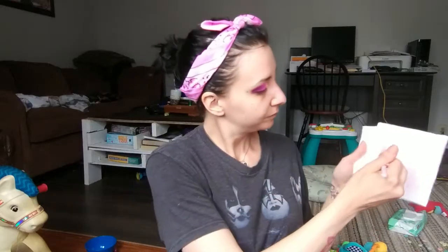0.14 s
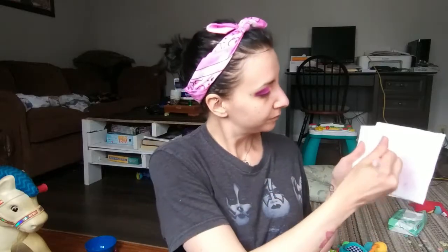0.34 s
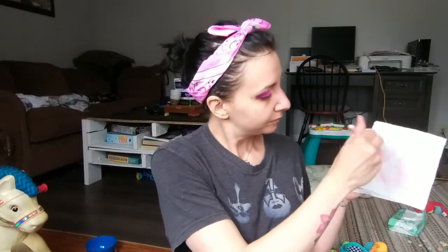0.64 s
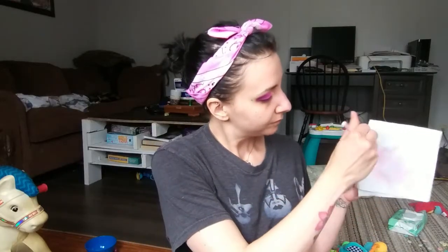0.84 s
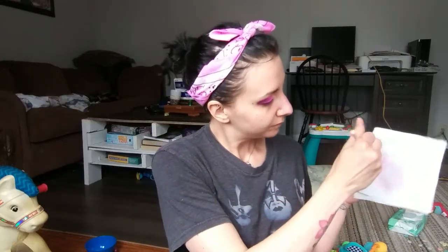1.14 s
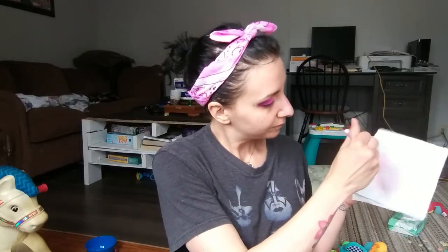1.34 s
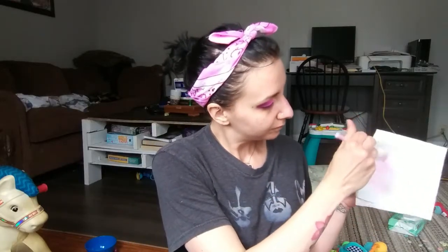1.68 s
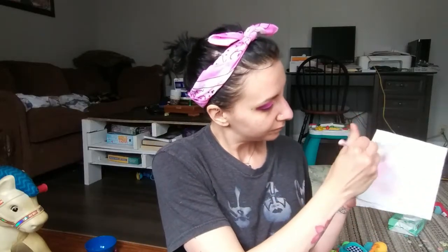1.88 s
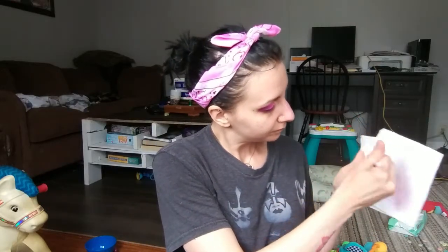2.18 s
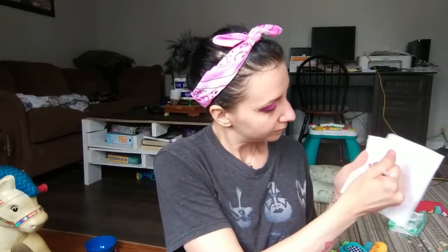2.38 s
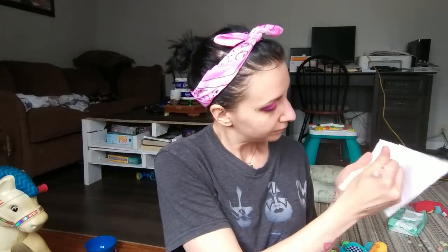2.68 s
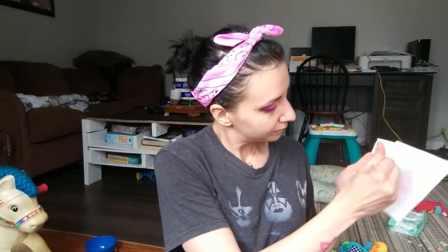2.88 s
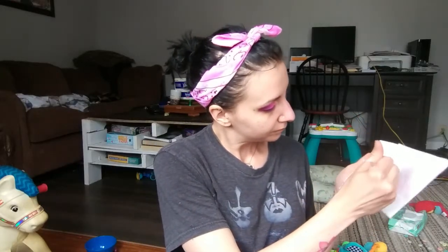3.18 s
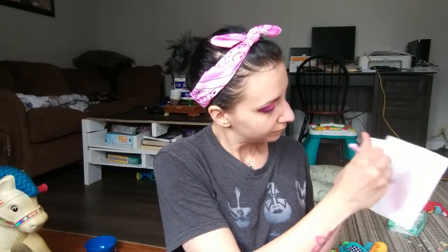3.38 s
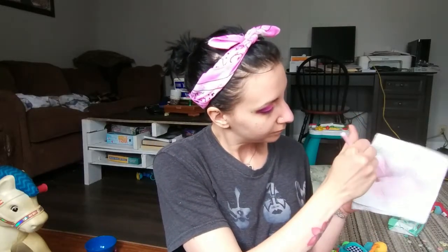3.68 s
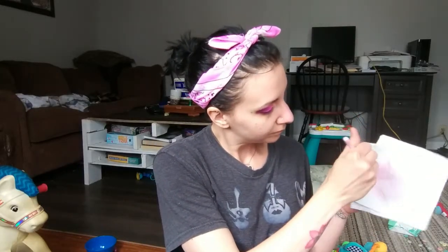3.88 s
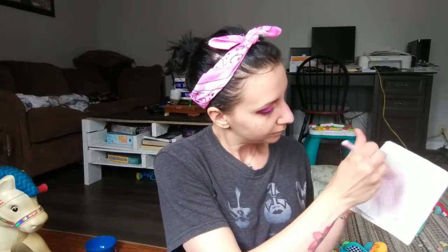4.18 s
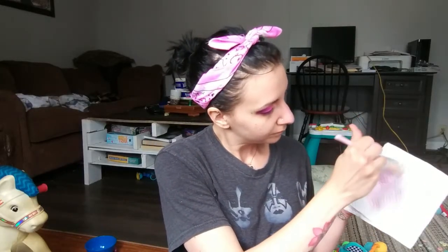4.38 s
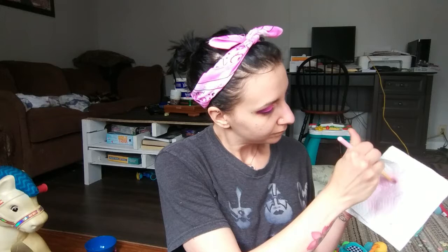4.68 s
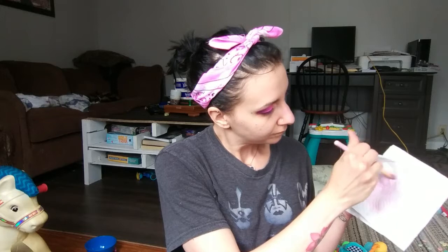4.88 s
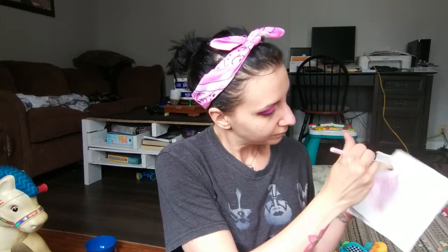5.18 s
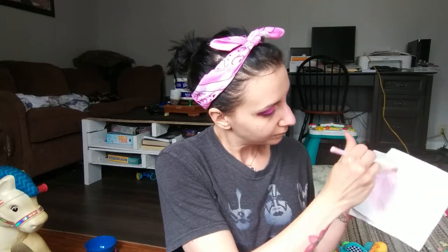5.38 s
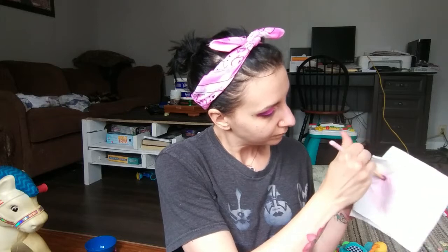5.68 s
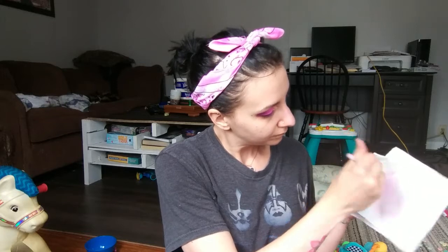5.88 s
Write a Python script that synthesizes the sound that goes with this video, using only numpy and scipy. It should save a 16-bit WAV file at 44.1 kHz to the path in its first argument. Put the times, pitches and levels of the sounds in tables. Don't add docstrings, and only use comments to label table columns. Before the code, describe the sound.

A soft makeup brush scrubs quickly back and forth on a paper towel, dry and hissy, with tiny clicks over a low room hum.

```python
import sys
import numpy as np
from scipy import signal
from scipy.fft import rfft, irfft
from scipy.io import wavfile

SR = 44100
rng = np.random.default_rng(int(sys.argv[2]) if len(sys.argv) > 2 else 0)


def pcm_store(signal):
    levels = np.round(np.clip(np.atleast_2d(signal), -1, 1) * 32767)
    wavfile.write(sys.argv[1], SR, levels.astype(np.int16).T)


def gain_from_db(level_db):
    decades = np.asarray(level_db, float) / 20
    return 10 ** decades


N = 266805


def rms_one(x):
    return x / np.sqrt(np.mean(x ** 2) + 1e-20)


def in_time(rows):
    s, level_db = np.transpose(rows)
    return np.interp(np.arange(N) / SR, s, level_db)


def colour(x, spectrum):
    size = 2 ** 14
    hz, level_db = np.transpose(spectrum)
    log_hz = np.log(np.maximum(np.arange(size // 2 + 1), 1) * SR / size)
    gain = gain_from_db(np.interp(log_hz, np.log(hz), level_db))
    cepstrum = irfft(np.log(gain))
    cepstrum[1:size // 2] *= 2
    cepstrum[size // 2 + 1:] = 0
    kernel = irfft(np.exp(rfft(cepstrum)))
    return signal.fftconvolve(x, kernel / np.sqrt(np.sum(kernel ** 2)))[:len(x)]


def resonate(x, hz, width_hz):
    r = np.exp(-np.pi * width_hz / SR)
    poles = [1, -2 * r * np.cos(2 * np.pi * hz / SR), r * r]
    return np.sqrt((1 - r * r) / 2) * signal.lfilter([1, 0, -1], poles, x)


def drift(rate_hz):
    r = np.exp(-2 * np.pi * rate_hz / SR)
    return rms_one(signal.lfilter([1], [1, -2 * r, r * r], rng.standard_normal(N + SR))[SR:])


def grains(per_s, spread_db):
    sizes = gain_from_db(spread_db * np.minimum(rng.exponential(1, N), 4))
    signs = rng.choice([-1, 1], N)
    return rms_one(sizes * signs * (rng.random(N) < per_s / SR))


# (frequency [Hz], density [dB per Hz])
AIR_TONE = [(30, -31.5), (42, 3), (55, -0.5), (105, 2.5), (120, 0), (140, -3), (200, -0.5), (250, -10),
            (500, -21.5), (1000, -24.5), (2500, -30.5), (6000, -33.5), (8300, -34.5), (11000, -48)]


def still_air():
    return gain_from_db(-51) * colour(rng.standard_normal(N + SR), AIR_TONE)[SR:]


# (frequency [Hz], width [Hz], level [dB])
ROOM_RESONANCES = [(42, 21, -65.5), (181, 18, -71.5), (276.2, 13, -65.5), (364.3, 18, -73), (454, 8.4, -67),
                   (473, 9.8, -70.5)]


def room_resonances():
    out = np.zeros(N)
    for hz, width_hz, level_db in ROOM_RESONANCES:
        out += gain_from_db(level_db) * resonate(rng.standard_normal(N + SR), hz, width_hz)[SR:]
    return out


# (middle [s], peak [dB], frequency [Hz], length [s])
FLOOR_THUDS = [
    (0.517, -52, 49.3, .2),
    (2.125, -45, 42, 0.16),
    (2.506, -52, 42, .2),
    (2.999, -48, 50, 0.1),
    (3.873, -46, 45.7, 0.24),
    (5.286, -59, 44, .15),
    (5.666, -40.5, 45, 0.11),
]


def floor_thuds():
    t = np.arange(N) / SR
    out = np.zeros(N)
    for s, peak_db, hz, length_s in FLOOR_THUDS:
        swell = np.exp(-(4 * (t - s) / length_s) ** 2 / 2)
        out += gain_from_db(peak_db) * swell * np.sin(2 * np.pi * hz * (t - s))
    return out


# (time [s], depth [dB])
HUM_FADES = [(.2, 6.5), (.69, 5), (.89, 5.5), (1.3, 9.5), (1.7, 9), (2.18, 5), (2.49, 11.5), (2.75, 6),
             (3.2, 8.5), (3.49, 0.5), (3.67, 5), (3.95, 7.5), (4.26, 2), (4.58, 7), (4.79, 1.5),
             (5.08, 3.5), (5.5, 7), (5.73, 4.5), (5.93, 11.5)]


def fan_hum():
    t = np.arange(N) / SR
    hum_hz, hum_db, fade_s = 120.15, -45, 0.056
    level_db = hum_db - sum(depth_db * np.exp(-abs(t - s) / fade_s) for s, depth_db in HUM_FADES)
    return np.sqrt(2) * gain_from_db(level_db) * np.sin(2 * np.pi * hum_hz * t + 0.28 * drift(3.1))


# (time [s], level [dB])
SCUFF_SWELL = [
    (.045, -78),
    (.058, -51),
    (.085, -45.5),
    (.135, -47.5),
    (.16, -52.5),
    (.21, -59.5),
    (.26, -74),
    (.33, -82),
]
# (frequency [Hz], density [dB per Hz])
SCUFF_TONE = [(150, -31), (250, -3), (305, -2), (349, -16), (373, -14), (393, -7), (455, -4.5), (920, -1.5),
              (1390, -14.5), (2130, -14), (6000, -29), (7800, -73), (13200, -120)]
# (frequency [Hz], width [Hz], level [dB])
HOLLOW_RINGS = [(306, 45, -14.5), (600, 64, -13.5), (726, 61, -17), (883, 22, -8), (990, 69, -22)]


def scuff():
    level_db = in_time([(0.0072, -100)] + list(SCUFF_SWELL) + [(.45, -100)])
    scrape = gain_from_db(level_db - 1.5) * grains(6000, spread_db=3.0)
    rings = sum(gain_from_db(ring_db) * resonate(scrape, hz, width_hz) for hz, width_hz, ring_db in HOLLOW_RINGS)
    return colour(scrape, SCUFF_TONE) + rings


def room_tail(x):
    t60_s, gap_s = 0.43, .006
    t = np.arange(int(t60_s * SR)) / SR
    tail = rng.standard_normal(len(t)) * gain_from_db(-60 * t / t60_s) * (t > gap_s)
    return signal.fftconvolve(x, tail / np.sqrt(np.sum(tail ** 2)))[:N]


# (time [s], level [dB])
HAND_LEVEL = [
    (0, -82),
    (.15, -72),
    (.3, -78.5),
    (3.8, -76),
    (4.1, -67),
    (4.4, -68.5),
    (5.27, -64),
    (5.56, -69),
    (6.05, -67),
]
# (frequency [Hz], density [dB per Hz])
HAND_TONE = [(1000, -25.5), (1500, -13), (2000, -11.5), (2400, -8), (2650, -9.5), (2900, -15.5),
             (3600, -19.5), (5000, -41)]


def hand():
    return colour(gain_from_db(in_time(HAND_LEVEL)) * rng.standard_normal(N), HAND_TONE)


# (fastest moment [s], bristle peak [dB], sheet minus bristle [dB])
STROKES_AWAY = [(.387, -55, -15), (.568, -55, -13), (0.772, -49, -19), (.945, -51.5, -11.5),
                (1.14, -55.5, -10.5), (1.326, -58, -4.5), (1.51, -52.5, -11.5), (1.707, -49.5, -11.5),
                (1.894, -49, -12.5), (2.086, -56.5, -9.5), (2.317, -56.5, -10), (2.508, -52.5, -12),
                (2.692, -53.5, -17), (2.904, -52, -16), (3.074, -57.5, -18), (3.269, -56.5, -13.5),
                (3.447, -61, -18), (3.67, -51.5, -10.5), (3.852, -51.5, -13.5), (4.058, -57, -25),
                (4.282, -58.5, -10), (4.477, -53, -17), (4.66, -50.5, -11.5), (4.857, -49.5, -17),
                (5.034, -52, -20), (5.243, -57.5, -7), (5.42, -61.5, -4), (5.623, -50.5, -8.5),
                (5.806, -49.5, -12.5), (6.012, -59.5, -6)]
# (fastest moment [s], bristle peak [dB], sheet minus bristle [dB])
STROKES_BACK = [(.245, -60, -5), (.458, -57, -19), (0.655, -59, -10), (.843, -52.5, -12.5),
                (1.023, -50.5, -6.5), (1.215, -53, -9.5), (1.407, -50, -12), (1.591, -50.5, -10),
                (1.772, -51.5, -12.5), (1.966, -48, -12.5), (2.174, -56, -11), (2.392, -57, -9.5),
                (2.59, -52.5, -12), (2.784, -53.5, -7.5), (2.973, -55, -12), (3.161, -51, -14),
                (3.328, -54, -12.5), (3.54, -61, -14), (3.742, -48.5, -10.5), (3.925, -54.5, -18),
                (4.15, -56.5, -7), (4.35, -56.5, -15), (4.538, -51, -16), (4.736, -51.5, -13),
                (4.924, -49.5, -18), (5.112, -52, -18), (5.32, -61.5, -12), (5.495, -56, -8),
                (5.688, -51, -10.5), (5.889, -49.5, -14)]


def stroke_rows():
    away = [(*row, .6, 0.63) for row in STROKES_AWAY]
    back = [(*row, 0.76, 0.5) for row in STROKES_BACK]
    s, peak_db, sheet_db, rise, fall = np.transpose(sorted(away + back))
    gaps = np.diff(s, prepend=s[0] - .1, append=s[-1] + 0.11)
    longest_s = .12
    rise_s = np.minimum(rise * gaps[:-1], longest_s)
    fall_s = np.minimum(fall * gaps[1:], longest_s)
    octaves = 0.3 * (peak_db - peak_db.mean()) + 0.57 * rng.standard_normal(len(s))
    sheet_hz = np.clip(3500 * 2 ** octaves, 900, 6500)
    return np.transpose([s, peak_db, rise_s, fall_s, sheet_db, sheet_hz])


def speed(row, fullness):
    s, peak_db, rise_s, fall_s = row[:4]
    at = np.arange(max(int((s - rise_s) * SR), 0), min(int((s + fall_s) * SR), N))
    phase = (at / SR - s) / np.where(at < s * SR, rise_s, fall_s)
    return at, gain_from_db(peak_db) * np.cos(np.pi / 2 * np.clip(phase, -1, 1)) ** fullness


def stroke_power(rows, fullness, extra_db):
    out = np.zeros(N)
    for row, more_db in zip(rows, extra_db):
        at, level = speed(row, fullness)
        out[at] += (level * gain_from_db(more_db)) ** 2
    return out


def bent_sheet(rows, rubbing):
    out = np.zeros(N)
    for row in rows:
        at, level = speed(row, 1.15)
        sheet_hz = row[5]
        out[at] += gain_from_db(-17.0) * resonate(level * rubbing[at], sheet_hz, 0.29 * sheet_hz)
    return out


# (time [s], peak [dB])
FIBRE_SNAPS = [(.5534, -28), (1.9661, -21), (1.029, -31), (2.7825, -29), (3.744, -29), (5.797, -25),
               (.858, -38), (1.2063, -36), (1.3251, -37), (2.4636, -43), (2.9893, -40), (3.156, -36),
               (3.671, -35), (5.7749, -38), (5.9191, -37)]


def fibre_snaps():
    s, peak_db = np.transpose(FIBRE_SNAPS)
    clicks = np.zeros(N)
    clicks[np.round(s * SR).astype(int)] = gain_from_db(peak_db)
    return clicks


# (frequency [Hz], density [dB per Hz])
BRISTLE_TONE = [(1290, -40), (2200, -11), (2350, -12), (2550, -12), (3110, -14), (3670, -9.5),
                (4230, -12.5), (4710, -10), (5830, -11), (7110, -7), (8260, 3.5), (8530, 1), (10900, -23),
                (15100, -26.5), (15900, -29)]
# (frequency [Hz], density [dB per Hz])
SHEET_TONE = [(300, -54.5), (600, 9), (1000, 3), (1700, 5), (2500, 2.5), (3500, -1), (5000, -13.5)]


def brush():
    rows = stroke_rows()
    resting_db = -72.5
    hiss_level = np.sqrt(stroke_power(rows, 2.4, np.zeros(len(rows))) + gain_from_db(resting_db) ** 2)
    sheet_level = np.sqrt(stroke_power(rows, 1.93, rows[:, 4]))
    snag = gain_from_db(1.5 * drift(70))
    snaps = fibre_snaps()
    hiss = colour(hiss_level * snag * grains(14000, spread_db=0.0) + snaps, BRISTLE_TONE)
    rubbing = snag * grains(5000, spread_db=5.0)
    sheet = colour(sheet_level * rubbing + 0.43 * snaps, SHEET_TONE)
    return hiss + sheet + bent_sheet(rows, rubbing)


def scene():
    background = still_air() + room_resonances() + floor_thuds() + fan_hum()
    near = hand() + brush()
    mono = background + scuff() + near + gain_from_db(-9.5) * room_tail(near)
    return np.array([np.roll(mono, 1), mono])


def band_limit(x):
    return signal.sosfilt(signal.butter(12, 15760, fs=SR, output="sos"), x)


def record(dry):
    return band_limit(dry)


dry = scene()
out = record(dry)
pcm_store(out)
```